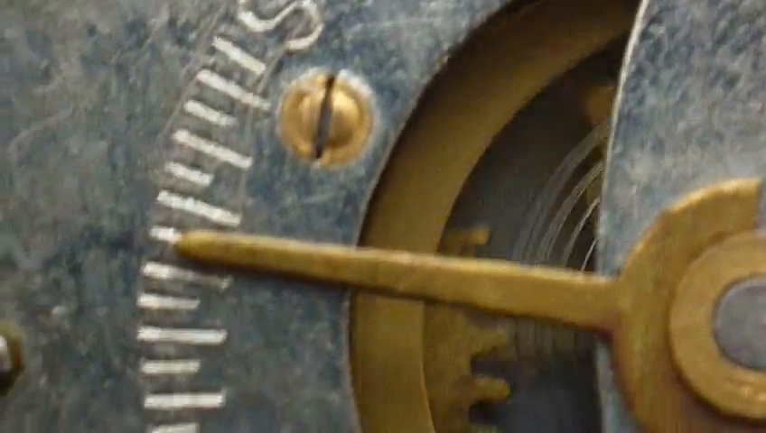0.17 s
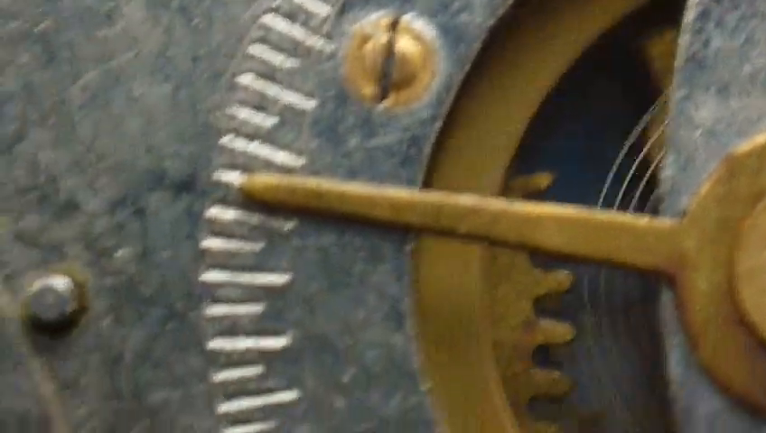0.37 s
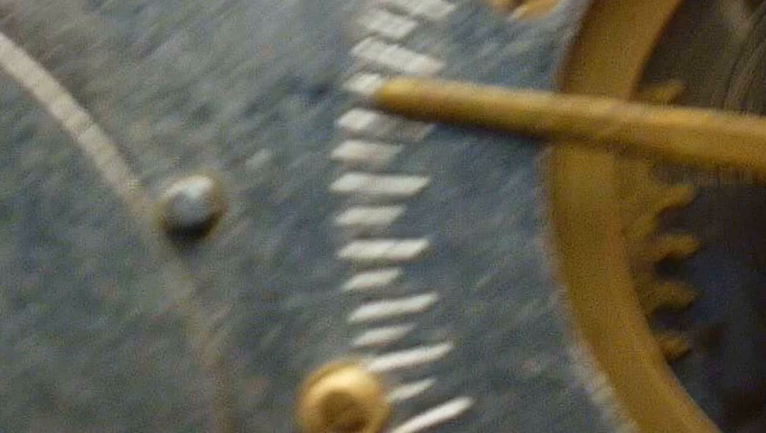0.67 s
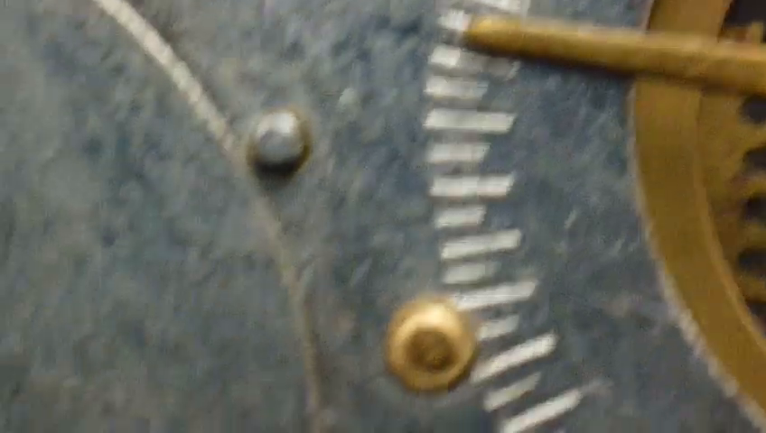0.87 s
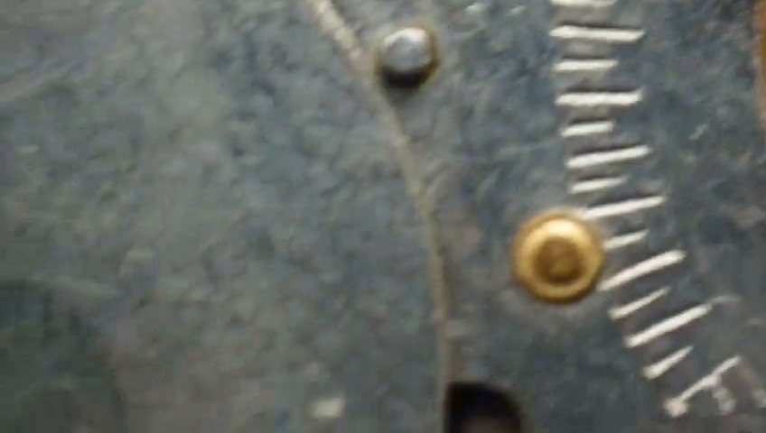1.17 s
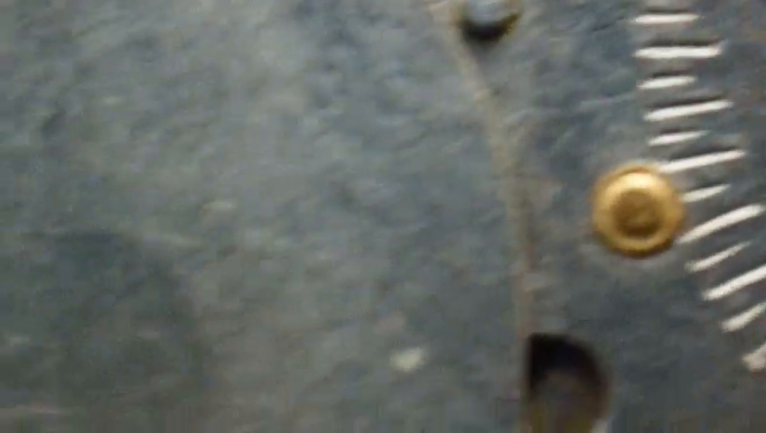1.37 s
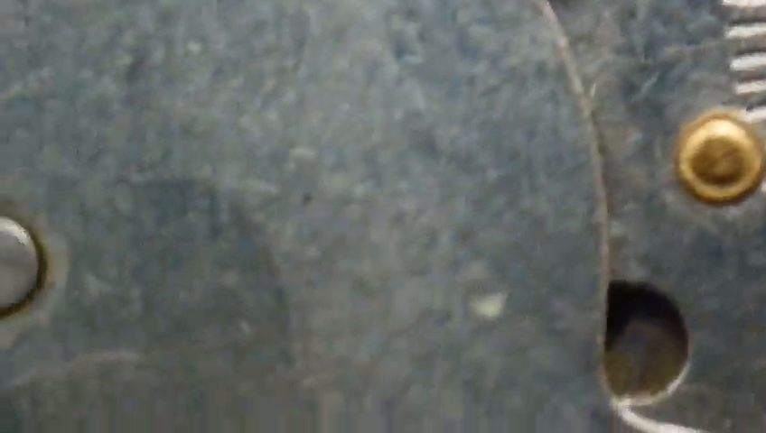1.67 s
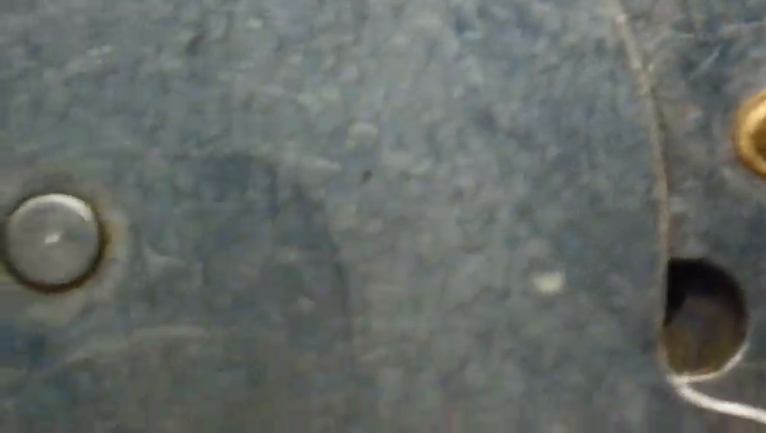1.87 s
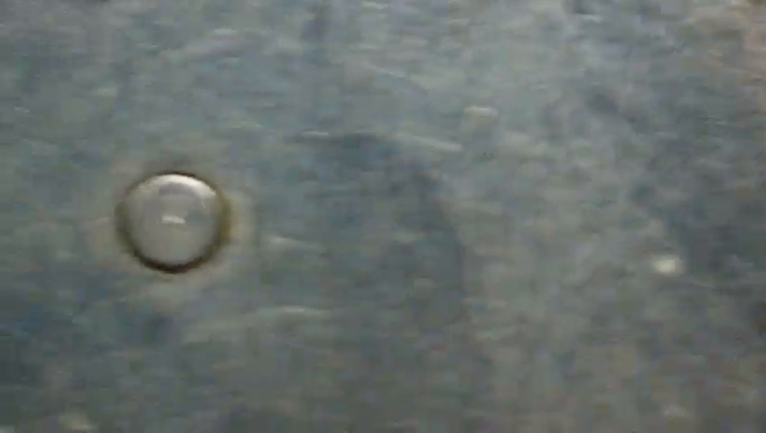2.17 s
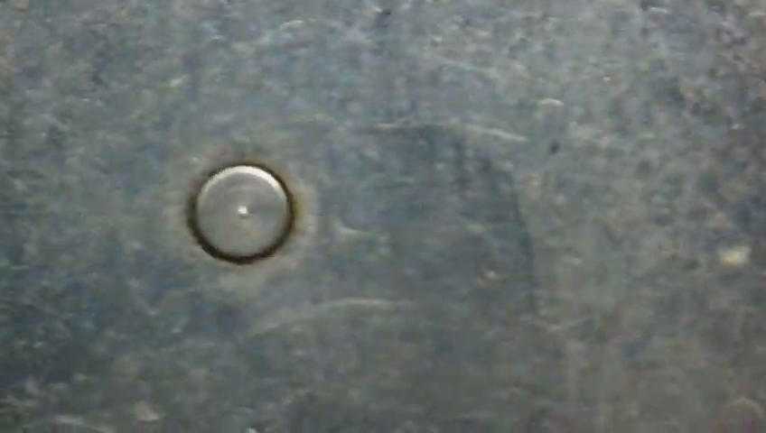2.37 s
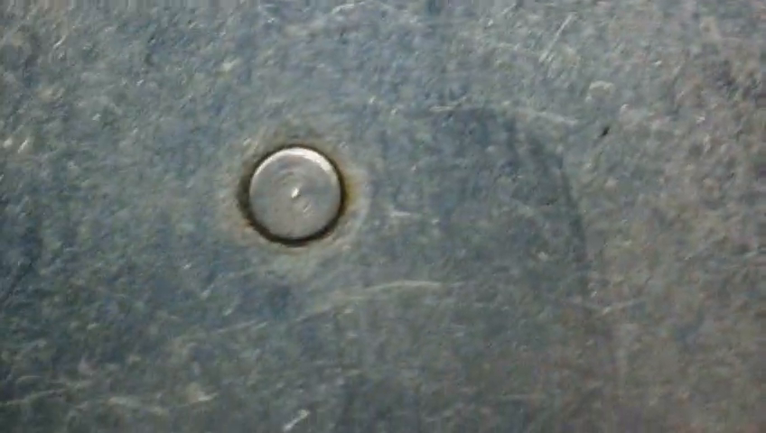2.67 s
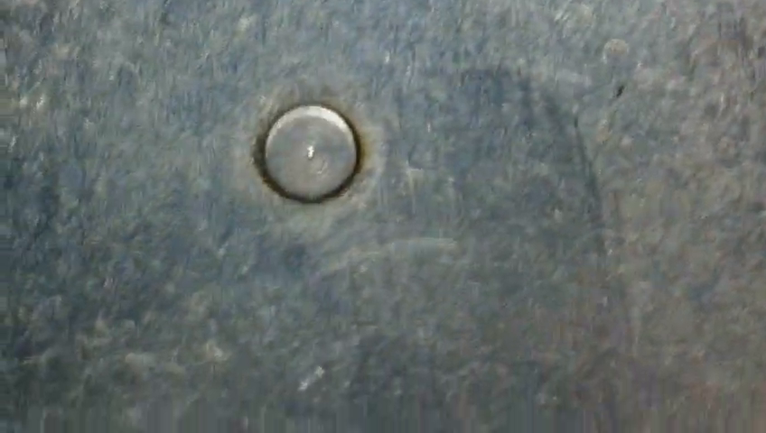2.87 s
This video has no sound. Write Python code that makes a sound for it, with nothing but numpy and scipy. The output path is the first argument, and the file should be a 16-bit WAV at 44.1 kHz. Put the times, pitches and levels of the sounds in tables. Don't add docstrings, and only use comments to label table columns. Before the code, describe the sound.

A mechanical pocket watch ticks from 0 to 3 seconds, starting mid-beat, about every quarter second. Each dry, bright tick is a quick cluster of three tiny metal knocks within about 40 milliseconds, the last usually sharpest, with alternating colour and a very short ring. Faint scuffs occur near 0.2, 0.65, 1.35, 1.65 and 2.3 seconds, amid sparse tiny clicks, wavering low hums, airy whoosh, rumble and hiss.

```python
import sys
import numpy as np
from scipy import signal
from scipy.fft import rfft, irfft
from scipy.io import wavfile
from scipy.ndimage import uniform_filter1d

SR = 44100
rng = np.random.default_rng(int(sys.argv[2]) if len(sys.argv) > 2 else 0)


def nominal_scale(level):
    x = np.asarray(level, float) / 20
    return 10 ** x


def pcm_store(signal):
    levels = np.round(np.clip(np.atleast_2d(signal), -1, 1) * 32767)
    wavfile.write(sys.argv[1], SR, levels.astype(np.int16).T)


N = 133182


def evened(x):
    return x / np.sqrt(np.mean(x ** 2) + 1e-20)


def smoothed(x, size):
    return uniform_filter1d(uniform_filter1d(x, size=size), size=size)


def add(mix, start_s, sound):
    part = mix[round(start_s * SR):][:len(sound)]
    part += sound[:len(part)]


def resonate(x, hz, width_hz):
    turn = np.exp(2j * np.pi * hz * np.arange(len(x)) / SR)
    r = np.exp(-np.pi * width_hz / SR)
    return 2 * (turn * signal.lfilter([1 - r], [1, -r], x / turn)).real


def resonate_twice(x, hz, width_hz):
    return resonate(resonate(x, hz, width_hz), hz, width_hz)


def watch():
    # start_s, level_db, brightness_db, case_db, rebound_db
    unlocks = [(.2119, -53.5, -15, -6, -12), (.4805, -64, -3, 0, -6), (.7143, -55, -4, 8, -2),
               (.9822, -55.5, -6, -2, 0), (1.2165, -51.5, -8.5, 0, -3), (1.485, -65, -1, -5, 2),
               (1.7190, -54, -8, 0, -4), (1.9884, -51.5, -12, -5, -9), (2.2228, -53, -6, -1, 2),
               (2.4917, -58.5, -3, -4, 0), (2.7252, -53.5, -6, 2, -2), (2.9944, -58, -19, 10, -2)]
    impulses = [(.0002, -56, -6, 6, -3.5), (0.2331, -51.5, -4.5, -5, -5), (0.5027, -47.5, -12, 10, 2),
                (0.7341, -54.5, -2, -3, 0), (1.005, -48.5, -12.5, 1, -4), (1.2361, -54.5, -3, -7, -5),
                (1.5064, -48.5, -7, -2, 3.5), (1.7375, -55, -3, 0, 7), (2.0094, -49.5, -11, -13, -7),
                (2.2423, -50.5, -6, -6, 0), (2.5075, -48, -9, 1, 6), (2.7464, -57.5, 1.5, -5, -4),
                (3.0114, -52, -5, -6, 2)]
    drops = [(0.0114, -49, -0.5, 2, 2), (0.2459, -51.5, 1.5, 6, -5), (0.5146, -50, 1.5, 4, -2.5),
             (0.7492, -49.5, -1, -0.5, -5), (1.0173, -46.5, -3, 1, 2), (1.2506, -50.5, 1.5, -3, -12),
             (1.5195, -47, -1.5, -6, 3.5), (1.7530, -49, -1, -2, 3), (2.0215, -45, 0, -5.5, 0),
             (2.257, -49, 1, 0.5, -3), (2.5237, -44.5, -3, -6.5, -0.5), (2.7585, -45.5, 0, 0.5, 2.5)]
    out = np.zeros(N)
    for kind, rows in enumerate((unlocks, impulses, drops)):
        for start_s, *blow in rows:
            add(out, start_s, knock(kind, start_s, *blow))
    return out


def knock(kind, start_s, level_db, bright_db, case_db, spring_db):
    # pitch_hz, time to fade by 60 dB (t60_s)
    plate = [(1645, 0.052), (2215, 0.057), (2570, .035), (3110, 0.043), (3445, 0.027), (3835, 0.021),
             (4125, 0.023), (4750, 0.027), (5215, 0.027), (5560, 0.024), (6045, 0.037), (7040, 0.04),
             (7750, 0.018), (8450, 0.012)]
    # unlock_db, impulse_db, drop_db
    first_stone = [(-4, -5, 1), (-19, -7, -15.5), (-21, -14, -5), (-9.5, -8.5, -2), (0.5, -4, 1),
                   (-4, -6, -3), (-15, -3.5, -11), (-17, -9, -10), (-4, -4, 4), (3, 5, 2.5), (0, 4.5, -1.5),
                   (-16, -3.5, -8.5), (-26, -14, -15), (-27, -26, -19)]
    second_stone = [(2.5, 2, -5), (-14, -12.5, -12.5), (-2, -13, -9), (-3, -11.5, -8), (0, -1.5, -4.5),
                    (-6, -9, 0), (-12, -17, -7.5), (-10, -13, -9.5), (9, -10, 3.5), (-6, 7, 3), (6, 6.5, 3),
                    (-8, -16, -5), (-16, -20, -13), (-20, -20, -9)]
    # rise_s, rebound_delay_s, rebound_db, crack_db, ring_length (share of t60_s)
    kinds = [
        (0.001, .0020, -1.5, 1.5, 0.75),
        (0.00071, .0029, -3.5, 3, 0.35),
        (0.00033, .0028, -6.5, 8.5, 0.77),
    ]
    # centre_hz, width_hz, level_db
    crack_bands = [
        (1900, 1400, -3),
        (3460, 1830, -3),
        (6300, 5600, 1.5),
    ]
    beats_per_s, body_hz, treble_hz = 4, 2800, 4400
    case_rise_s, case_hz = 0.0044, 1620
    after_db, after_stretch = -10, 2.7
    detune, split = .006, .022
    share_spread_db, rebound_jitter, second_rebound_db = 1.5, .2, -2
    crack_t60_s, weigh_s = 0.017, .008

    rise_s, delay_s, rebound_db, crack_db, length = kinds[kind]
    hz, t60_s = np.transpose(plate)[:, :, None]
    stone = first_stone if round(start_s * beats_per_s) % 2 else second_stone
    share_db = np.array(stone)[:, kind, None] + case_db * (hz < body_hz)
    high = hz[:, 0] > treble_hz
    t = np.arange(2600) / SR
    body, treble = np.zeros(2600), np.zeros(2600)
    swell = 1 - np.exp(-t / (rise_s + case_rise_s * (case_hz / hz) ** 6))
    fall_db = -60 * t / (t60_s * length)
    fade = nominal_scale(fall_db) + nominal_scale(after_db + fall_db / after_stretch)
    tune, phase, twin = rng.standard_normal((3, len(plate), 1))

    for bounce in range(3):
        late_s = bounce * delay_s * (1 + rebound_jitter * rng.uniform(-0.9, 1))
        bounce_db = bounce * (rebound_db + spring_db) + second_rebound_db * (bounce > 1)
        spread, slip = rng.standard_normal((2, len(plate), 1))
        ring = np.sin(2 * np.pi * (hz * (1 + detune * tune) * t + phase + slip))
        partner = np.sin(2 * np.pi * hz * (1 + split * twin) * t + phase * slip)
        ring = np.where(hz > body_hz, (ring + partner) / np.sqrt(2), ring)
        modes = swell * nominal_scale(bounce_db + share_db + share_spread_db * spread) * fade * ring

        burst_db = bounce_db + crack_db - 60 * t / crack_t60_s
        burst = swell[-1] * nominal_scale(burst_db) * rng.standard_normal(len(t))
        case, low, top = (nominal_scale(db) * resonate_twice(burst, f, width) for f, width, db in crack_bands)
        add(body, late_s, modes[~high].sum(axis=0) + low + nominal_scale(case_db) * case)
        add(treble, late_s, modes[high].sum(axis=0) + top)

    head = round(weigh_s * SR)
    body = body / body[:head].std()
    treble = treble / treble[:head].std()
    return nominal_scale(level_db) * (body + nominal_scale(bright_db) * treble)


def rustles():
    # start_s, length_s, level_db, centre_hz
    scuffs = [
        (0.195, 0.013, -52, 1440),
        (0.217, 0.017, -54, 1510),
        (0.542, 0.052, -59, 1550),
        (0.653, 0.031, -52, 1520),
        (1.347, 0.062, -57.5, 1500),
        (1.655, 0.03, -53, 1480),
        (2.293, 0.05, -57.5, 1360),
        (2.44, 0.023, -61, 1780),
        (2.664, 0.035, -58.5, 1550),
        (2.973, 0.022, -61, 1520),
    ]
    width_hz, grain_db = 135, 1
    out = np.zeros(N)
    for start_s, length_s, db, hz in scuffs:
        noise = rng.standard_normal(4000)[:int(length_s * SR)]
        grain = evened(uniform_filter1d(rng.standard_normal(4000), size=90))
        noise = noise * nominal_scale(grain_db * grain[:len(noise)])
        add(out, start_s, nominal_scale(db) * np.hanning(len(noise)) * evened(resonate(noise, hz, width_hz)))
    return out


def spikes():
    large_s = [.001, .0263, .0479, .0624, .1947, .3724, .5541, .5815, .5924, .6542, .7083, .8967, .9277,
               .9696, 1.0479, 1.1893, 1.1947, 1.3326, 1.409, 1.4108, 1.5561, 1.567, 1.766, 1.7949, 2.1308,
               2.299, 2.555, 2.6551, 2.6929, 2.8322, 2.9338, 2.9411]
    spike_db, small_db, small_per_s, filter_hz = -38.5, -46.5, 22, 9700
    train = nominal_scale(small_db) * (rng.random(N) < small_per_s / SR) * rng.uniform(-0.44, 1.15, N)
    places = np.round(np.array(large_s) * SR).astype(int)
    train[places] = nominal_scale(spike_db) * rng.uniform(0.9, 0.97, len(large_s))
    shape = signal.firwin(31, filter_hz, window=("kaiser", 4), fs=SR)
    return np.convolve(train, shape / shape.max(), "same")


def drones():
    # pitch_hz, width_hz, level_db
    steady_tones = [(1103, 4.3, -76), (550, 3.5, -75.5), (2150, 2.1, -80), (2680, 2.6, -82),
                    (4240, 2.3, -92), (7870, 11, -87.5), (7800, 25, -94)]
    # time_s, level_db
    whoosh_curve = [(0.05, -62.5), (0.4, -64.5), (0.85, -54.5), (0.87, -62), (1.34, -62.5), (1.36, -53.5),
                    (1.54, -68.5), (1.57, -56.5), (2.27, -61), (2.33, -57), (2.35, -65), (2.73, -55.5),
                    (2.75, -60), (2.95, -61.5)]
    motor_curve = [(0.05, -72), (0.09, -60), (0.15, -86), (0.19, -69.5), (0.48, -65), (0.5, -62.5),
                   (1.16, -55.5), (1.2, -66), (1.97, -59.5), (2.02, -76), (2.32, -76), (2.36, -64.5),
                   (2.92, -69.5), (2.95, -67)]
    upper_curve = [(0.05, -58.5), (0.34, -62), (0.36, -50), (0.4, -61), (1.52, -57.5), (1.59, -72),
                   (1.68, -44.5), (1.72, -65), (2.1, -57.5), (2.2, -67), (2.25, -56.5), (2.37, -70.5),
                   (2.4, -54), (2.7, -60.5), (2.77, -53), (2.82, -61.5), (2.9, -51.5), (2.95, -63.5)]
    lower_curve = [(0.05, -69.5), (0.35, -77), (0.44, -63), (0.53, -79), (0.57, -60.5), (1.24, -61),
                   (1.56, -85), (1.58, -60), (2.01, -70), (2.04, -69), (2.08, -59), (2.18, -85),
                   (2.33, -64), (2.42, -86), (2.51, -78), (2.55, -88), (2.76, -62), (2.95, -65.5)]
    steady = sum(swelling([(0, db)], hz, width_hz) for hz, width_hz, db in steady_tones)
    whoosh = nominal_scale(-1) * swelling(whoosh_curve, hz=644, width_hz=335)
    middle = motor(motor_curve, hz=180.3, wander_hz=5.16)
    upper = nominal_scale(-3) * motor(upper_curve, hz=247.6, wander_hz=7.07)
    lower = nominal_scale(-3.5) * motor(lower_curve, hz=119.5, wander_hz=6.13)
    return steady + whoosh + middle + upper + lower


def swelling(curve, hz, width_hz):
    s, db = np.transpose(curve)
    band = resonate_twice(rng.standard_normal(N), hz, width_hz)
    return nominal_scale(np.interp(np.arange(N) / SR, s, db)) * evened(band)


def motor(curve, hz, wander_hz):
    throb_db = 1.5
    s, db = np.transpose(curve)
    wander = evened(smoothed(rng.standard_normal(N), 2500))
    tone = np.sqrt(2) * np.sin(2 * np.pi * np.cumsum(hz + wander_hz * wander) / SR)
    throb = evened(smoothed(rng.standard_normal(N), 2000))
    return nominal_scale(np.interp(np.arange(N) / SR, s, db) + throb_db * throb) * tone


def hiss():
    # pitch_hz, level_db (per Hz)
    colour = [(45, -32), (120, -5), (280, -2.5), (700, -13), (1700, -13.5), (2600, -19.5), (6300, -23),
              (8200, -31)]
    hiss_db, patch_db, lumpy_hz = -52.5, 1.65, 2010
    frames, hz = N // 256 + 5, np.fft.rfftfreq(1024, 1 / SR)
    real, imaginary, patches = rng.standard_normal((frames, 513, 3)).T
    patches = evened(uniform_filter1d(uniform_filter1d(patches, size=7, axis=0), size=10, axis=1))
    f, db = np.transpose(colour)
    lumpy = 1 / (1 + (hz / lumpy_hz) ** 2)[:, None]
    field_db = np.interp(np.log(hz + 1), np.log(f), db)[:, None] + lumpy * patch_db * patches
    spectrum = (real + 1j * imaginary) * nominal_scale(field_db)
    noise = signal.istft(spectrum, nperseg=1024, noverlap=768)[1][:N]
    return nominal_scale(hiss_db) * evened(noise)


def scene():
    return (watch() + rustles() + spikes() + drones() + hiss())[None]


def band_edge(x):
    edge_hz, slope_db_per_khz = 8125, -10.5
    hz = np.fft.rfftfreq(len(x), 1 / SR)
    over_khz = np.maximum(hz - edge_hz, 0) / 1000
    loss_db = np.maximum(slope_db_per_khz * over_khz * (1 + 0.17 * over_khz), -100)
    return irfft(rfft(x) * nominal_scale(loss_db), len(x))


def band_limit(x):
    return signal.sosfilt(signal.butter(12, 15350, fs=SR, output="sos"), x)


def record(dry):
    grain_db, offset = -95.5, -.0754
    x = band_edge(dry[0]) + nominal_scale(grain_db) * rng.standard_normal(N) + offset
    return band_limit(x[None])


dry = scene()
out = record(dry)
pcm_store(out)
```